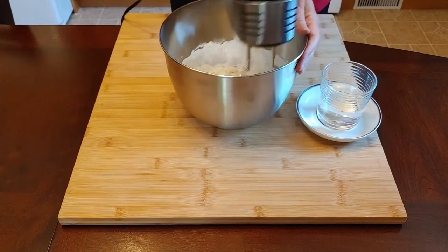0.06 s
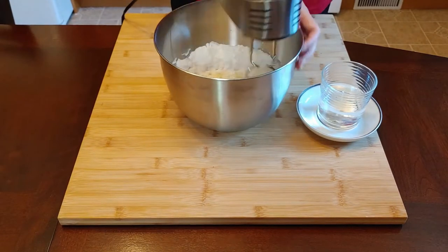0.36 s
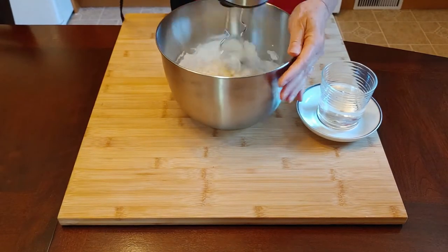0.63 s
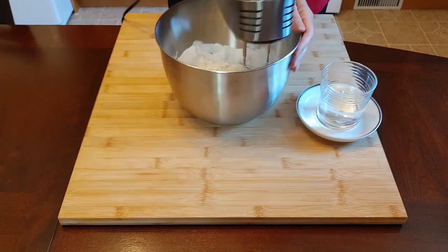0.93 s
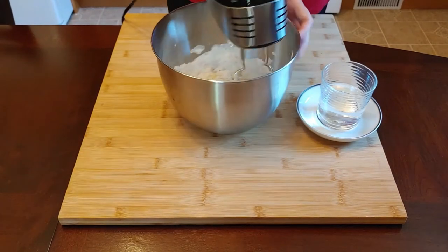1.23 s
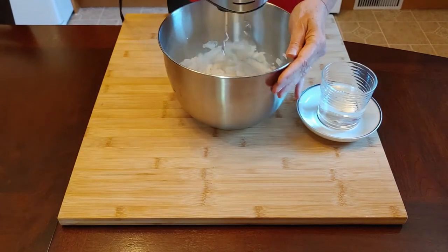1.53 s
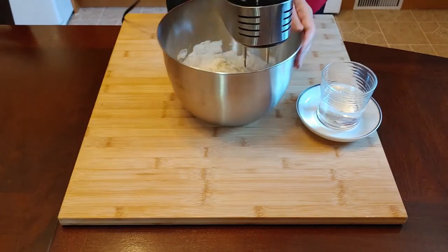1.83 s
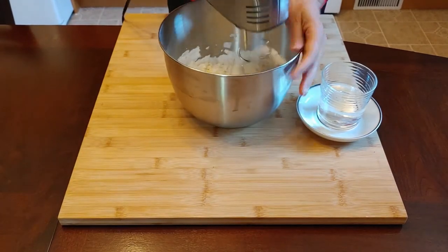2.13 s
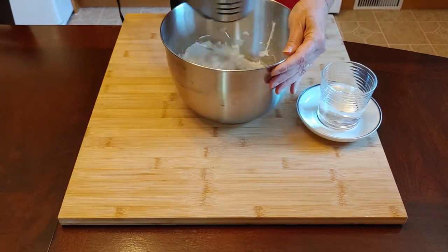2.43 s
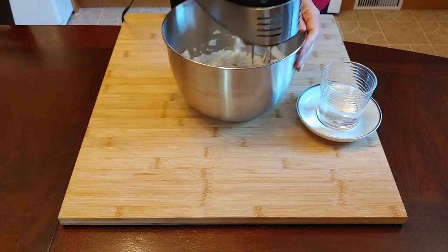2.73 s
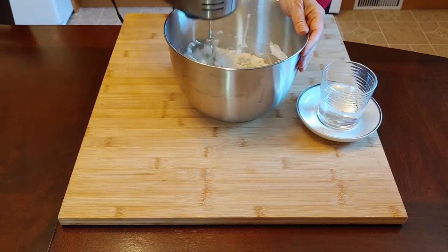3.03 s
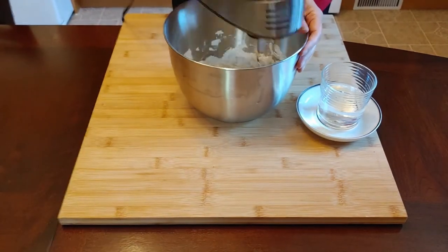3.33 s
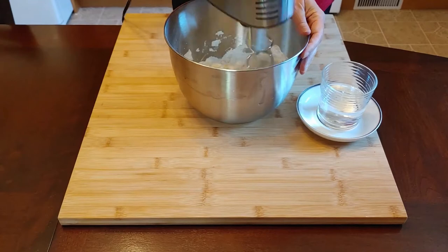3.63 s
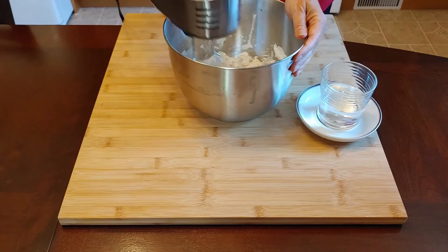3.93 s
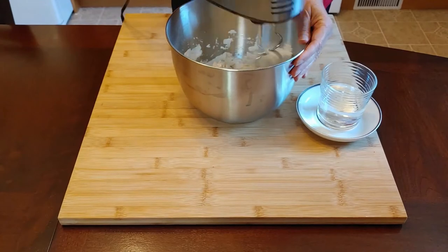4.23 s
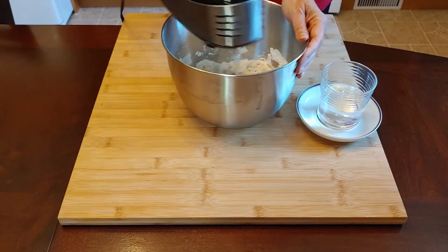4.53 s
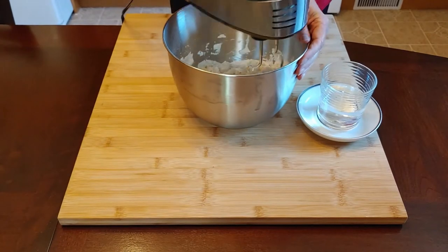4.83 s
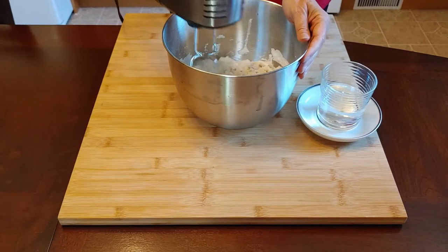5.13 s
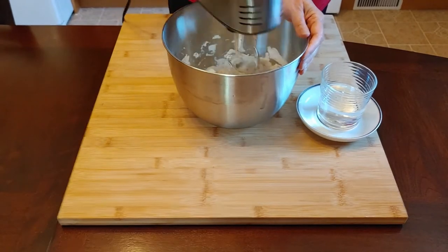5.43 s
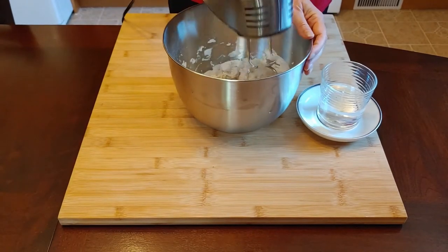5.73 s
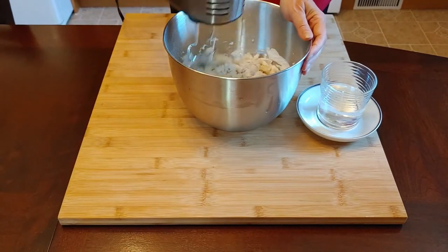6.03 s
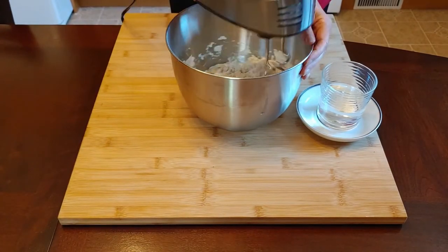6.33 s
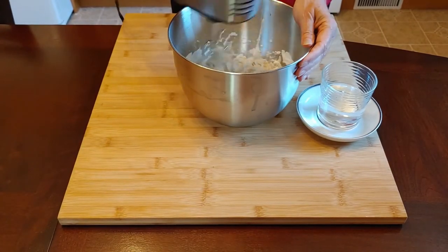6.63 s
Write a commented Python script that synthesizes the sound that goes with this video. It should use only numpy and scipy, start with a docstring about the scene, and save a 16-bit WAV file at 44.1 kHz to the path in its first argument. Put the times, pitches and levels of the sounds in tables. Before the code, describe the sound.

An electric hand mixer whirrs and whines loudly, its beaters churning stiff dough and rubbing against a steel bowl.

```python
"""A loud whirr and whine, close by: an electric mixer moved round a steel bowl of stiff dough.
The rotor hums and whines over the rush of its fan. As the beaters bite, churning and gears grow louder
and the motor sags, slowing overall as the dough stiffens. The beaters rub short rings from the bowl and,
near the end, squeal along it. The level drops after the first second, and the rush dips briefly now and
then, once down to tones and bass. One microphone in front of the bowl feeds both channels."""
import sys
import numpy as np
from scipy import signal
from scipy.fft import rfft, irfft
from scipy.io import wavfile
from scipy.ndimage import uniform_filter1d, map_coordinates

SR = 44100
rng = np.random.default_rng(int(sys.argv[2]) if len(sys.argv) > 2 else 0)


def persist_wave(psi):
    """Save psi, clipped to +-1, as 16-bit WAV."""
    counts = np.round(np.clip(psi, -1, 1) * 32767).astype(np.int16)
    wavfile.write(sys.argv[1], SR, np.atleast_2d(counts).T)


N = 298557


def rotor_angle(flutter, flutter_rate):
    """The rotor sags with each stroke, slows as the dough stiffens and flutters on lumps; in radians."""
    # rotor speed: (time [s], speed [turns/s])
    speed_curve = [(0.12, 305.0), (0.3, 301.7), (0.88, 303.4), (1.23, 299.3), (1.51, 300.3), (1.78, 303.2),
                   (2.08, 297.1), (2.33, 297.9), (2.69, 300.2), (2.99, 294.9), (3.34, 298.2), (3.61, 291.2),
                   (3.97, 294.2), (4.27, 292.5), (4.73, 296.1), (5.03, 296.1), (5.16, 293.6), (5.46, 293.9),
                   (5.69, 289.3), (5.96, 288.6), (6.18, 292.3), (6.77, 293.1)]
    speed, = in_time(speed_curve)
    return 2 * np.pi * np.cumsum(speed * (1 + flutter * drift(flutter_rate))) / SR


def whine(angle, presence_db, lead_db, lesser_db, flare_db, waver_db):
    """Body, gears, fan and armature sing at multiples of the rotor speed; lesser tones flare at random."""
    # strongest rotor tones: (name, multiple of the speed, relative level [dB], fade [dB/s])
    lead_tones = [("body", 3, -42.5, 2.2), ("gear", 4, -48, 1.7), ("fan", 10, -39.5, 2.6),
                  ("whistle", 24, -54.5, .3), ("high whistle", 29, -57, 1.7), ("top whistle", 36, -64, .8)]
    # tones swell as the mixer is turned and moved about: (name, time [s], length [s], rise [dB])
    swells = [("gear", .36, .2, 8), ("gear", .73, .18, 10), ("gear", 2.12, .19, 15),
              ("gear", 2.56, .14, 15), ("gear", 2.8, .1, 10), ("gear", 4.85, .35, 8),
              ("gear", 5.56, .28, 10), ("fan", 1.65, .22, 5), ("fan", 2.25, .3, 5), ("fan", 2.67, .25, 9),
              ("fan", 3.05, .16, -7), ("fan", 3.47, .13, 8), ("fan", 4.12, .12, 6), ("fan", 4.74, .2, 10),
              ("whistle", .2, .35, 9), ("whistle", 1.76, .25, 7), ("whistle", 2.56, .6, 8),
              ("whistle", 3.43, .36, 8), ("whistle", 4.07, .14, 6), ("whistle", 4.58, .16, 7),
              ("whistle", 5.02, .16, 9), ("whistle", 5.41, .22, 9), ("whistle", 5.93, .2, 9),
              ("high whistle", .85, .45, 9), ("high whistle", 1.7, .4, 8), ("high whistle", 2.53, .3, 11),
              ("top whistle", 1.28, .2, 10), ("top whistle", 2.88, .24, 11), ("top whistle", 4.04, .14, 13),
              ("top whistle", 4.58, .16, 13), ("top whistle", 5.12, .2, 12), ("top whistle", 5.86, .36, 16)]
    # lesser rotor tones: (multiple of the speed, relative level [dB])
    lesser_tones = [(6, -56.5), (7, -59), (12, -58), (30, -66), (31, -67), (39, -72)]
    out = 0
    for name, order, db, fade in lead_tones:
        swell_db = sum(rise * bump(s, length) for which, s, length, rise in swells if which == name)
        tone = fading_tone(order * angle, scatter=.33, fade_rate=14)
        level_db = lead_db + db - fade * seconds() + swell_db + waver_db * np.tanh(drift(10.5))
        out = out + from_db(level_db) * evened(tone, size=5000)
    for order, db in lesser_tones:
        tone = fading_tone(order * angle, scatter=0.51, fade_rate=8.3)
        flare = from_db(flare_db * np.tanh(drift(3.9)))
        out = out + from_db(db + lesser_db + presence_db) * rms_one(tone * flare)
    return out


def hum(angle, level_db, waver_db):
    """The unbalanced rotor shakes the body once a turn, a little unsteadily as the beaters bite."""
    # strength of the hum: (time [s], relative level [dB])
    hum_curve = [(0.0, -36), (0.4, -41), (0.65, -43), (0.9, -35.5), (1.18, -40), (1.38, -62), (1.92, -41.5),
                 (2.1, -52.5), (3.05, -42.5), (3.75, -51.5), (4.0, -40), (4.1, -45), (5.55, -44),
                 (5.9, -53.5), (6.3, -46), (6.77, -43.5)]
    hum_db, = in_time(hum_curve)
    tone = fading_tone(angle, scatter=.2, fade_rate=22)
    return from_db(hum_db + level_db + waver_db * drift(9.7)) * evened(tone, size=6000)


def fan(angle, level_db, buzz_db, flicker_db):
    """Cooling air and brush buzz leave the vents and fall into the bowl."""
    # spectrum of the rush: (frequency [Hz], relative density [dB])
    rush_spectrum = [(60, -53), (115, -22.5), (170, -15.5), (220, -4.5), (340, 2.5), (450, -6),
                     (1900, -4.5), (3400, -4.5), (4200, -8.5), (5800, -11.5), (8700, -14), (11800, -25.5),
                     (13200, -31.5), (15500, -43)]
    vents = rng.standard_normal(N) + from_db(buzz_db) * brushes(angle, memory_turns=11.4)
    rush = bowl_reflections(vents, t60=0.08, wet=0.97, shift_rate=3.85)
    return from_db(level_db + flicker_db * drift(27)) * coloured(rush, rush_spectrum)


def brushes(angle, memory_turns, bumps_per_turn=256):
    """The brushes rub the same bumps every turn, a pattern that slowly wears into a new one: a buzz."""
    turns = angle / (2 * np.pi)
    kept = np.exp(-1 / memory_turns)
    wear = rng.standard_normal((2200, bumps_per_turn))  # one row a turn
    bumps = signal.lfilter([1], [1, -kept], wear, axis=0)[100:]
    track = signal.resample_poly(bumps.ravel(), 1, 2)
    return rms_one(map_coordinates(track, [turns * bumps_per_turn / 2], order=3))


def gears(angle, level_db, throb, top_hz=3700):
    """Gear teeth rattle the housing, which holds back their treble."""
    # housing resonances: (frequency [Hz], width [Hz], relative level [dB])
    housing_modes = [(2073, 75, -10), (2366, 60, 4.5), (2505, 194, -1), (3090, 73, 2), (3233, 53, 0.5),
                     (3590, 180, -10)]
    teeth = grains(per_s=9000, spread_db=1.5) * (1 + throb * np.sin(angle))
    muffled = signal.sosfilt(signal.butter(10, top_hz, fs=SR, output="sos"), teeth)
    rattle = bowl_reflections(muffled, t60=0.11, wet=1.6, shift_rate=2.67)
    return from_db(level_db) * resonate(rattle, housing_modes, wander_db=4, wander_rate=5)


def churning(angle, level_db, throb, top_hz=2600):
    """Soft crumbs and beaters patter into the bowl, shaken once a turn by the rotor."""
    # bowl resonances: (frequency [Hz], width [Hz], relative level [dB])
    bowl_modes = [(640.4, 30, -9.5), (546, 91, -13), (963, 29, -4.5), (1024, 45, 5), (1113, 42, -4.5),
                  (1464, 23, -10), (1657, 78, -8.5)]
    patter = grains(per_s=4000, spread_db=0.5) * (1 + throb * np.sin(angle))
    soft_patter = signal.sosfilt(signal.butter(3, top_hz, fs=SR, output="sos"), patter)
    return from_db(level_db) * resonate(soft_patter, bowl_modes, wander_db=4.5, wander_rate=4)


def strokes():
    """The beaters bite into the dough: the rise of the churning and of the gear rattle, in dB."""
    # strokes through the dough: (time [s], length [s], churning rise [dB], gear rise [dB])
    bites = [(0.369, 0.45, 6, 2), (1.23, 0.4, 4, 3), (2.112, 0.4, 4, 4.5), (2.7, 0.22, -2, -1),
             (3.597, 0.18, 3, 0.5), (4.183, 0.28, 4, 3.5), (4.736, 0.24, 4.5, 4.5), (5.2, 0.35, 4, 2.5),
             (5.702, 0.5, 2, 3.5), (6.364, 0.31, 4.5, 5)]
    return sum(np.outer([churn_db, gear_db], bump(s, length)) for s, length, churn_db, gear_db in bites)


def grazes():
    """A beater grazes the wall and the bowl rings out: the rise of the churning, in dB."""
    # touches on the wall: (time [s], length [s], rise [dB])
    touches = [(1.13, 0.13, 2), (1.347, 0.095, 8), (2.17, 0.12, 0.5), (3.67, 0.045, 8), (4.143, 0.076, 2.5),
               (5.776, 0.051, 10), (6.43, 0.13, 5)]
    return sum(db * bump(s, length) for s, length, db in touches)


def squeals(attack_s, waver, stutter_db):
    """A beater sticks and slips on the steel: each note builds, stutters and rings out."""
    # squealing notes: (start [s], length [s], pitch [Hz], level [dB], ring-out t60 [s], overtone [dB])
    notes = [(5.848, .06, 5455, -32, .52, -17), (5.855, .05, 5670, -35, .3, -13),
             (5.872, .07, 4890, -37, .2, -22), (5.948, .05, 3835, -34, .9, -15),
             (5.952, .065, 3900, -36.5, .45, -14)]
    t, out = seconds(), 0
    for start, length, hz, db, t60, overtone_db in notes:
        attack = np.clip((t - start) / attack_s, 0, 1)
        ring_out = from_db(-60 * np.clip((t - start - length) / t60, 0, 2))
        phase = 2 * np.pi * hz * np.cumsum(1 + waver * drift(121.3)) / SR
        note = np.sin(phase) + from_db(overtone_db) * np.sin(2 * phase)
        stutter = from_db(stutter_db * np.tanh(drift(76.7)))
        out = out + from_db(db) * attack * ring_out * evened(note * stutter, size=2000)
    return out


def rings(level_db, width_hz):
    """Each rub of a beater feeds one narrow resonance of the steel with tiny slips."""
    # rubs on the wall: (time [s], length [s], pitch [Hz], relative level [dB])
    rubs = [(1.5, .14, 1480, -46), (.54, .12, 3190, -37), (.55, .14, 2430, -39), (1.1, .22, 3090, -37),
            (1.34, .08, 3079, -42), (1.62, .24, 1665, -42.5), (2.71, .14, 1640, -43),
            (3.07, .11, 3100, -42), (3.12, .14, 2335, -38.5), (3.63, .09, 3251, -43),
            (3.69, .14, 2519, -43), (3.8, .11, 1464, -45), (4.16, .09, 2325, -42), (5.7, .16, 2325, -43),
            (5.82, .09, 3057, -41), (6.24, .19, 2282, -42), (6.31, .09, 1916, -44)]
    slips, out = grains(per_s=3000, spread_db=2.5), 0
    r = np.exp(-np.pi * width_hz / SR)
    for s, length, hz, db in rubs:
        ring = signal.lfilter([1, 0, -1], [1, -2 * r * np.cos(2 * np.pi * hz / SR), r * r], slips)
        out = out + from_db(db + level_db) * bump(s, length) * evened(ring, size=1500)
    return out


def scrape(level_db, full_at_s=5.885, attack_s=0.34, hold_s=0.075, t60=0.28):
    """Dense slips of wire on steel under the squeals: they build, hold and die away."""
    # spectrum of the scrape: (frequency [Hz], relative density [dB])
    scrape_spectrum = [(1500, -40), (3300, -0.5), (4300, -11), (5600, 0), (8300, -13), (11300, -18),
                       (14000, -28), (15500, -43)]
    t = seconds() - full_at_s
    envelope_db = -60 * np.clip(np.maximum(-t / attack_s, (t - hold_s) / t60), 0, 2)
    slips = bowl_reflections(grains(per_s=2500, spread_db=4.5), t60=0.072, wet=0.98, shift_rate=3.8)
    return from_db(envelope_db + level_db) * coloured(slips, scrape_spectrum)


def rocking(presence_db, tremble_db=-74.5, rock_s=0.25):
    """The bowl trembles faintly on the board and rumbles when it is pushed."""
    # pushes that rock the bowl: (time [s], level [dB])
    pushes = [(1.15, -60), (2.0, -58), (2.8, -69), (3.5, -59)]
    # spectrum of the rumble: (frequency [Hz], relative density [dB])
    rumble_spectrum = [(12, -10), (26, 4.5), (50, -9), (80, -9.5), (200, -51)]
    level = from_db(tremble_db + presence_db) + sum(from_db(db) * bump(s, rock_s) for s, db in pushes)
    return level * coloured(rng.standard_normal(N), rumble_spectrum)


def resonate(drive, modes, wander_db, wander_rate, glide=.014):
    """Parallel resonances, wandering in strength and pitch as the mixer moves about; rms 1."""
    out = 0
    for k, (hz, width, db) in enumerate(modes):
        r = np.exp(-np.pi * width / SR)
        ring = signal.lfilter([1 - r, 0, r - 1], [1, -2 * r * np.cos(2 * np.pi * hz / SR), r * r], drive)
        # the body of the mixer covers more or less of the bowl, which retunes the cavity
        ring = np.interp(np.cumsum(1 + glide * drift(wander_rate)) % N, np.arange(N), ring)
        out = out + (-1) ** k * ring * from_db(db + wander_db * drift(wander_rate))
    return evened(out)


def bowl_reflections(x, t60, wet, shift_rate, patterns=3):
    """Dense reflections inside the steel bowl; their pattern shifts as the mixer moves. Rms 1."""
    t = np.arange(SR // 5) / SR
    reflected = 0
    for _ in range(patterns):
        echoes = rng.standard_normal(len(t)) * from_db(-60 * t / t60)
        reflected = reflected + drift(shift_rate) * signal.oaconvolve(x, echoes)[:N]
    return rms_one(rms_one(x) + wet * evened(reflected))


def fading_tone(phase, scatter, fade_rate):
    """A tone reaches the microphone with its reflections, which shift in strength and phase."""
    in_phase = (1 + scatter * drift(fade_rate)) * np.sin(phase)
    return in_phase + scatter * drift(fade_rate) * np.cos(phase)


def cavity(x, relative_half_width=0.028):
    """The hollow between mixer and bowl lifts some bands and cancels others: a metallic sheen."""
    # peaks and notches of the hollow: (frequency [Hz], gain [dB])
    bands = [(1900, -2.5), (2800, -2), (4200, -1.5), (5020, 2), (5380, -4), (5830, 3), (6680, -1.5),
             (8450, 2.5)]
    bins = np.fft.rfftfreq(N, 1 / SR)
    gain_db = sum(db * np.exp(-np.square((bins / hz - 1) / relative_half_width)) for hz, db in bands)
    return irfft(rfft(x) * from_db(gain_db), N)


def presence(loud_db=7.5, drop_at_s=1.176, drop_s=0.083, fade_db_per_s=0.3126):
    """The machine's gain at the microphone in dB: loud at first, a quick drop, and a slight fade."""
    t = seconds()
    return loud_db * (1 - np.clip((t - drop_at_s) / drop_s, 0, 1)) - fade_db_per_s * t


def dips(x, length_s=.015, depth_db=-14):
    """The rush dips briefly now and then, mostly in the treble."""
    # centres of the dips: (time [s])
    dip_times = [.326, 1.434, 1.476, 1.695, 1.967, 2.012, 2.438, 2.923, 3.08, 3.185, 3.272, 3.91, 3.953,
                 4.056, 4.486, 4.55, 4.997, 6.147]
    gain_db = depth_db * sum(flat_window(s, length_s) for s in dip_times)
    return ducked(x, gain_db, above_hz=3700, low_share=0.21)


def gap(x, at_s=5.511, length_s=.048, depth_db=-38):
    """Once, all but the bass drops out of the rush while a few tones ring on."""
    # tones heard in the gap: (frequency [Hz], relative level [dB])
    gap_tones = [(888, -44), (1663, -44), (2568, -41), (3149, -43), (3402, -47), (6035, -51), (9082, -53)]
    window = flat_window(at_s, length_s)
    held = sum(from_db(db) * np.sin(2 * np.pi * (hz * seconds() + rng.random())) for hz, db in gap_tones)
    return ducked(x, depth_db * window, above_hz=400, low_share=0) + window * held


def ducked(x, gain_db, above_hz, low_share):
    """Turn down the treble, and the rest by a share of those decibels."""
    treble = signal.sosfiltfilt(signal.butter(6, above_hz, "high", fs=SR, output="sos"), x)
    return from_db(gain_db) * treble + from_db(low_share * gain_db) * (x - treble)


def grains(per_s, spread_db):
    """Random tiny contacts of uneven size."""
    sizes = from_db(spread_db * np.minimum(rng.exponential(1, N), 4)) * rng.choice([-1, 1], N)
    return sizes * (rng.random(N) < per_s / SR)


def drift(rate):
    """A smooth random curve of rms about 1, changing about rate times a second."""
    step, run_in = 40, 2000  # samples a point; points left to settle
    r = np.exp(-2 * np.pi * step * rate / SR)
    noise = rng.standard_normal(N // step + run_in + 2)
    slow = signal.lfilter([1], [1, -2 * r, r * r], noise)[run_in:]
    return np.interp(np.arange(N) / step, np.arange(len(slow)), rms_one(slow))


def coloured(x, spectrum):
    """Give a steady sound a smooth spectrum; rms 1."""
    hz, db = np.transpose(spectrum)
    bins = np.maximum(np.fft.rfftfreq(N, 1 / SR), 1)
    gain = from_db(np.interp(np.log(bins), np.log(hz), db))
    return rms_one(irfft(rfft(x) * gain, N))


def bump(centre, length):
    """A smooth rise and fall of height 1."""
    return np.exp(-np.minimum(np.square(2 * (seconds() - centre) / length), 20))


def flat_window(centre, length):
    """A flat-topped window of height 1."""
    return np.exp(-np.clip(2 * (seconds() - centre) / length, -2, 2) ** 4)


def evened(x, size=3000):
    """Hold the running rms, taken over size samples, at 1."""
    return x / np.sqrt(uniform_filter1d(x ** 2, size=size) + 1e-12)


def rms_one(x):
    """Scale to rms 1."""
    return x / np.sqrt(np.mean(x ** 2) + 1e-20)


def from_db(db):
    """Decibels to gain."""
    return 10 ** (np.asarray(db) / 20)


def seconds():
    """Time of every sample."""
    return np.arange(N) / SR


def in_time(rows):
    """Each column of a curve, at every sample."""
    times, *columns = np.transpose(rows)
    return [np.interp(seconds(), times, column) for column in columns]


def scene():
    """Machine, dough and bowl, heard from one microphone in front."""
    angle = rotor_angle(flutter=0.00096, flutter_rate=12.8)
    presence_db = presence()
    churn_db, gear_db = strokes()
    graze_db = grazes()
    tones = hum(angle, level_db=-1.0, waver_db=2.05)
    tones += whine(angle, presence_db, lead_db=-2.5, lesser_db=-1.5, flare_db=13.5, waver_db=4.5)
    air = fan(angle, level_db=-38.0, buzz_db=-10, flicker_db=0.32)
    dough = from_db(churn_db + graze_db) * churning(angle, level_db=-44.5, throb=0.29)
    # the gears take on a small share of each graze
    rattle = from_db(gear_db + 0.12 * graze_db) * gears(angle, level_db=-40.5, throb=0.15)
    rush = cavity(air + dough + rattle)
    machine = from_db(presence_db) * gap(dips(rush))
    squeal = squeals(attack_s=.015, waver=.0055, stutter_db=7)
    bowl = squeal + rings(level_db=0.5, width_hz=26) + scrape(level_db=-33.5) + rocking(presence_db)
    return np.tile(tones + machine + bowl, (2, 1))


def record(dry):
    """The treble is cut steeply above 15.7 kHz."""
    return signal.sosfilt(signal.ellip(12, .1, 80, 15700, fs=SR, output="sos"), dry)


dry = scene()
out = record(dry)
persist_wave(out)
```